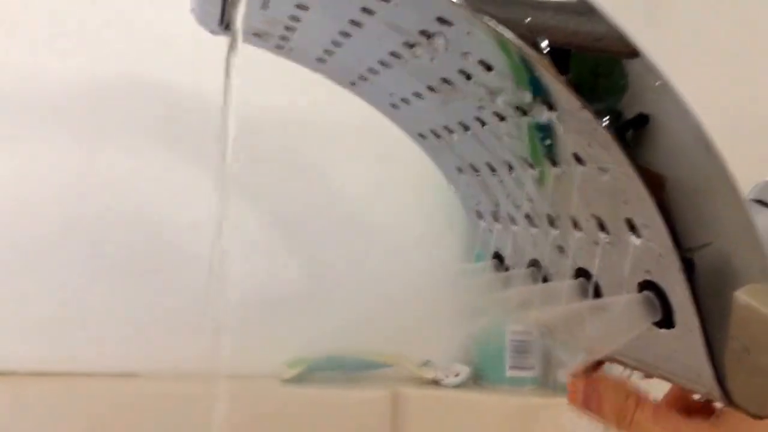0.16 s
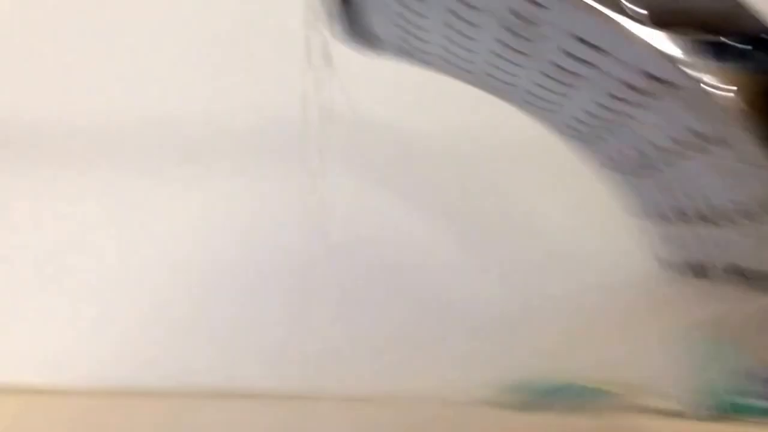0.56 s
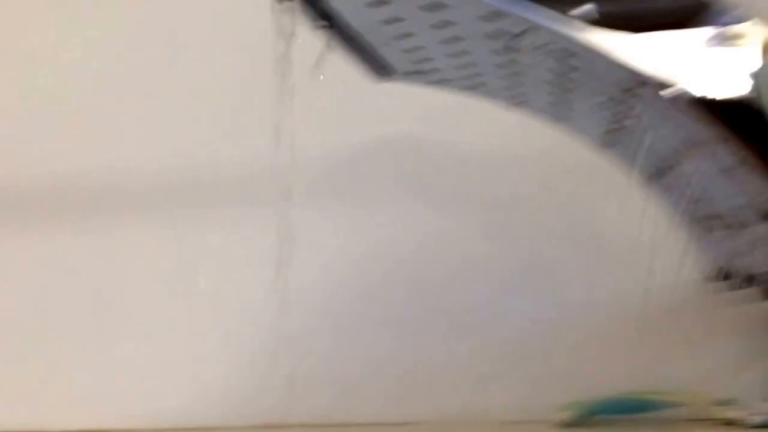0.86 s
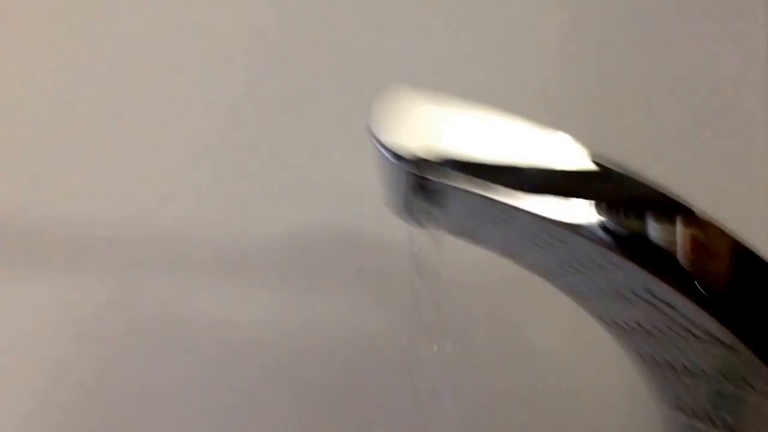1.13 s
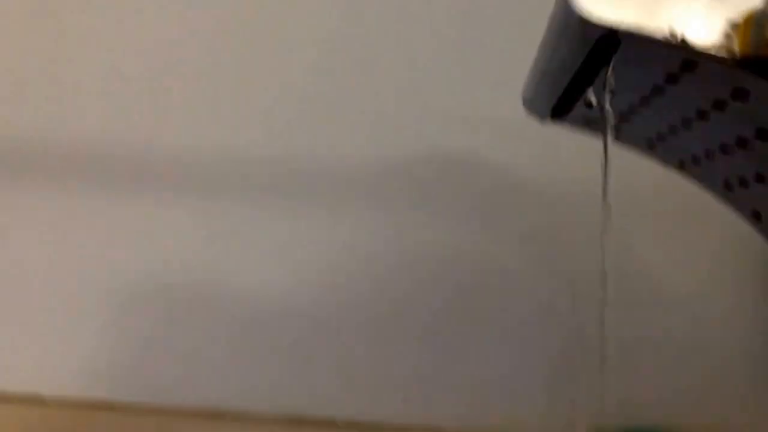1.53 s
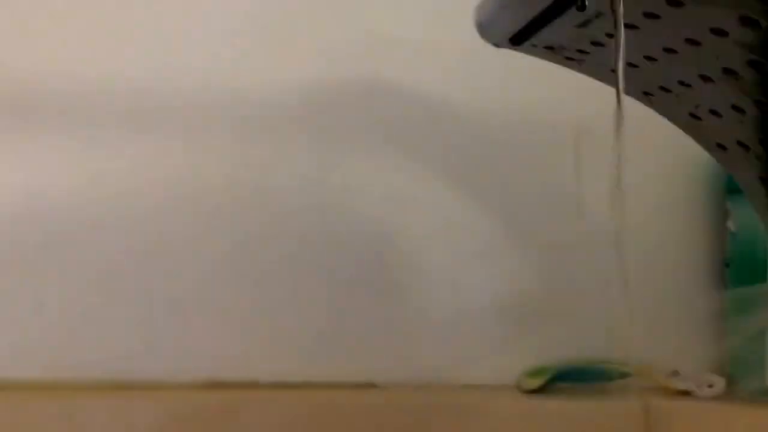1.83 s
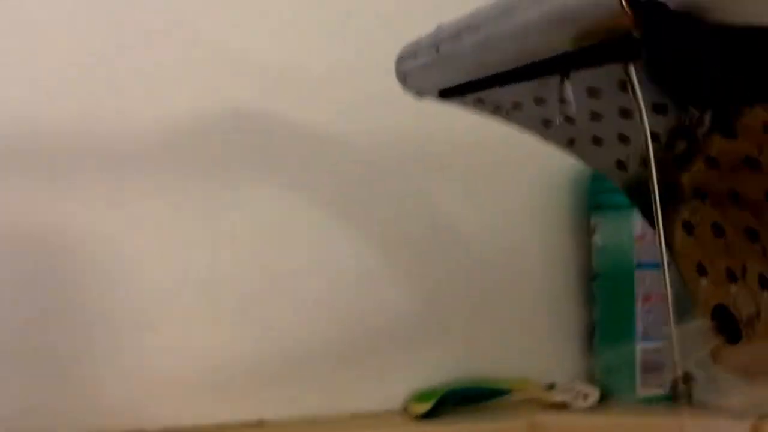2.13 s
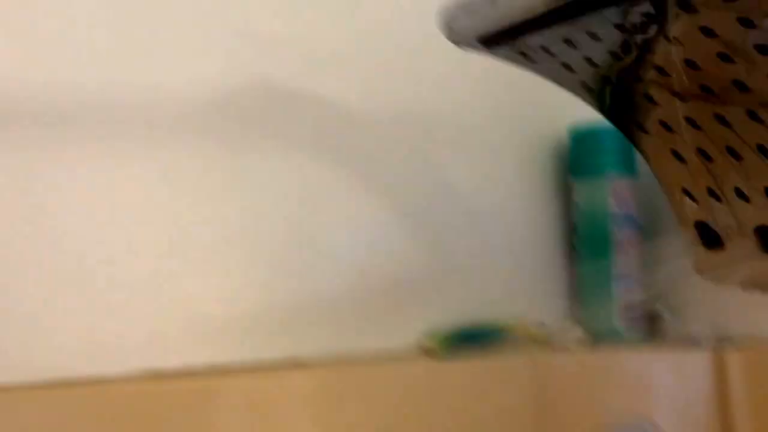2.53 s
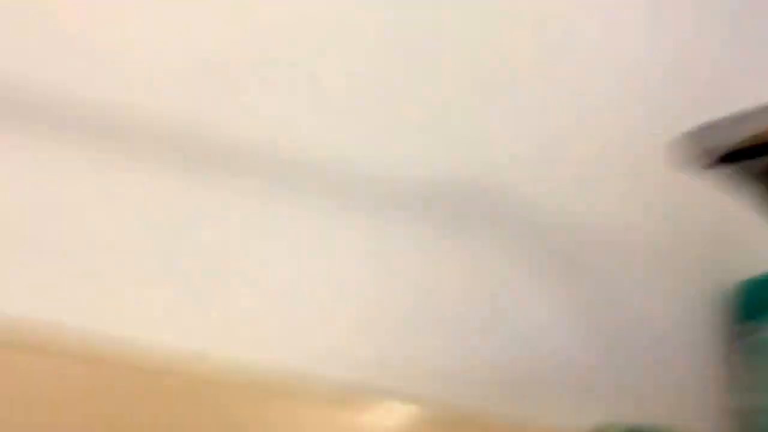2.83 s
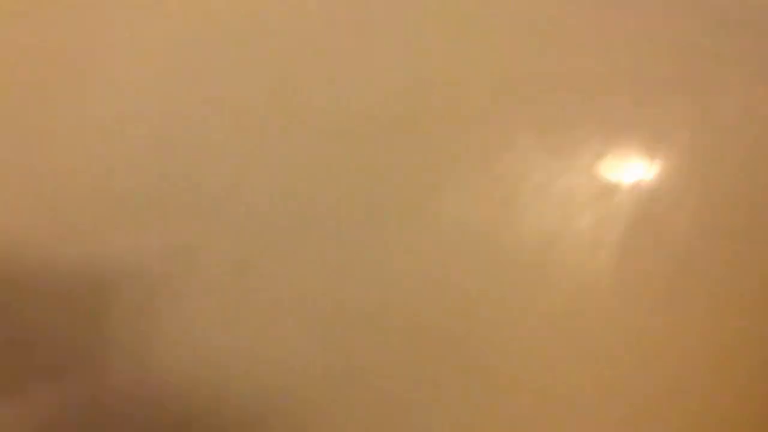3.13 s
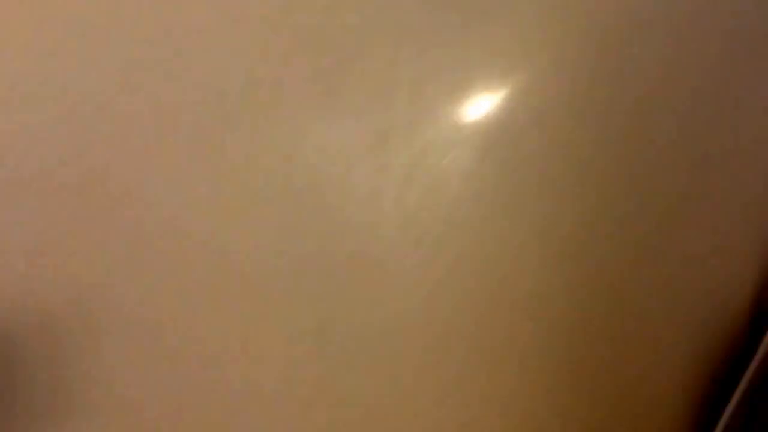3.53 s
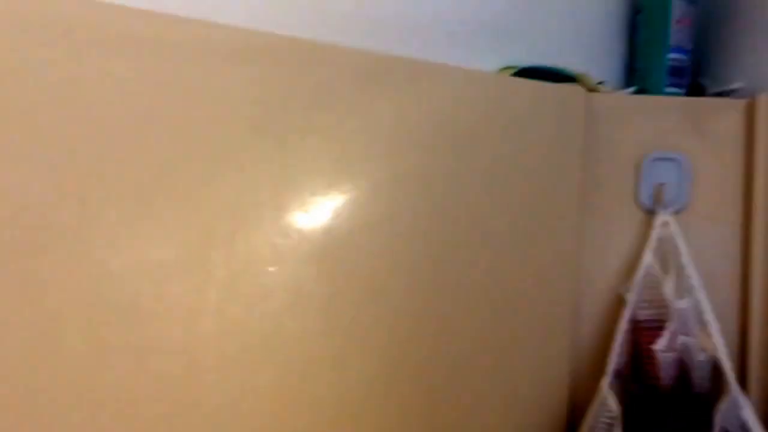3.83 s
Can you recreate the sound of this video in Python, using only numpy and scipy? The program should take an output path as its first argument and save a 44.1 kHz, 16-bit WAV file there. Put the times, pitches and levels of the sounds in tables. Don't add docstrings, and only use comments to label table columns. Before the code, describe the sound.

A shower head sprays a dense, bright, slightly fluttering hiss throughout, close to a small microphone in a tiled bathroom. Sharp drop ticks and small plinks cluster in the first 0.4 s, with a few later, over splashing, tub drumming and soft low handling knocks. From about 1.6 s the face fizz weakens; after 3 s hollow water thumps boom in the tub, and around 3.65 s the fizz drops away, leaving splash.

```python
import sys
import numpy as np
from scipy import signal
from scipy.fft import rfft, irfft, next_fast_len
from scipy.io import wavfile
from scipy.ndimage import uniform_filter1d, map_coordinates

SR = 44100
rng = np.random.default_rng(int(sys.argv[2]) if len(sys.argv) > 2 else 0)


def decibels_to_gain(level_db):
    exponent = np.asarray(level_db, float) / 20
    return 10 ** exponent


def wav_record(signal):
    frames = np.transpose(np.atleast_2d(signal))
    bounded = np.clip(frames, -1, 1)
    quanta = np.round(bounded * 32767).astype(np.int16)
    wavfile.write(sys.argv[1], SR, quanta)


N = 175518


def unit(x):
    return x / np.sqrt(np.mean(x ** 2) + 1e-20)


def curves(rows):
    s, *columns = np.transpose(rows)
    return [np.interp(np.arange(N) / SR, s, column) for column in columns]


def wobble(rate):
    return map_coordinates(rng.standard_normal(400), [np.arange(N) * min(rate, 90) / SR])


def filtered(x, response):
    m = next_fast_len(N + 8192)
    return irfft(rfft(x, m) * response(np.fft.rfftfreq(m, 1 / SR)), m)[..., :N]


def resonant(x, peaks):
    def response(f):
        power = 0
        for centre, breadth, db in peaks:
            distance = (f - centre) / breadth * 2
            power = power + decibels_to_gain(2 * db) / (1 + distance ** 2 / 3) ** 3
        return np.sqrt(power)
    return unit(filtered(x, response))


def spatter(patchy_db, spiky_db, share):
    z = signal.stft(rng.standard_normal(N), nperseg=512)[2]
    patches = uniform_filter1d(rng.standard_normal(z.shape), 5, axis=0)
    patches = uniform_filter1d(patches, 10, axis=1)
    hiss = signal.istft(z * decibels_to_gain(patchy_db * unit(patches)), nperseg=512)[1][:N]
    drop_size = np.minimum(rng.exponential(size=N), 7)
    impacts = rng.standard_normal(N) * decibels_to_gain(spiky_db * drop_size)
    share = np.clip(share, 0, 1)
    return np.sqrt(1 - share) * unit(hiss) + np.sqrt(share) * unit(impacts)


def mixed(main, extra, share_db):
    return (main + decibels_to_gain(share_db) * extra) / np.sqrt(2)


def thumps(rows, rise_s, sag):
    out, t = np.zeros(N + SR), np.arange(5000) / SR
    for s, db, hz in rows:
        phase = 2 * np.pi * hz * (t + sag * rise_s * (1 - np.exp(-t / rise_s)))
        swell = np.e * t / rise_s * np.exp(-t / rise_s)
        out[round(s * SR):][:len(t)] += decibels_to_gain(db) * swell * np.sin(phase)
    return out[:N]


def haze():
    # (frequency [Hz], level [dB])
    wash_tone = [(40, -32), (100, 1), (700, -5), (2800, -11), (4000, 3), (6500, -11), (8500, -3.5),
                 (14000, -5.5)]
    f, db = np.transpose(wash_tone)

    def colour(hz):
        return decibels_to_gain(np.interp(np.log(hz + 1), np.log(f), db, left=-40))
    return decibels_to_gain(-40) * unit(filtered(spatter(0.49, 0.85, 0.067), colour))


def bumps():
    # (time [s], peak [dB], pitch [Hz])
    knocks = [(.14, -41, 112), (.29, -43, 122), (.62, -45, 95), (1.055, -39, 115), (1.3, -38, 80.6),
              (1.68, -39, 115), (2.02, -42, 108), (2.28, -55.5, 70), (2.38, -48, 95), (2.68, -50, 80),
              (3.04, -40.5, 78), (3.483, -50, 80), (3.753, -38, 79)]
    # (frequency [Hz], width [Hz], level [dB])
    rumble = [(52, 22, -11), (78, 39, 8)]
    tremor_db = -62 + 3 * np.arange(N) / N + 2.8 * wobble(12)
    tremor = decibels_to_gain(tremor_db) * resonant(rng.standard_normal(N), rumble)
    return thumps(knocks, rise_s=0.0092, sag=0.22) + tremor


def tub():
    # (time [s], drumming [dB], depth of the microphone in the tub [0-1], ring of the rim [dB])
    tub_course = [(0, -40.5, 0.16, -56), (.3, -41.5, 0.06, -54), (.7, -41, 0.15, -53), (1, -39.5, 0, -47),
                  (1.3, -39.5, 0.1, -49), (1.6, -39.5, 0.2, -40.5), (1.9, -40, 0.3, -45),
                  (2.25, -38.5, 0.42, -38), (2.6, -39, 0.3, -41), (2.9, -42, 0.45, -39),
                  (3.05, -41.5, 0.96, -43.5), (3.5, -40.5, 0.87, -40.5), (3.98, -42, 0.72, -42.5)]
    # (time [s], peak [dB], pitch [Hz])
    slugs = [(2.45, -43, 237), (2.819, -45, 234), (2.925, -61, 236), (3.017, -39, 232), (3.113, -42, 231),
             (3.202, -43, 300), (3.24, -45, 225), (3.29, -51, 295), (3.38, -42, 155), (3.553, -44, 218),
             (3.64, -44, 244), (3.718, -45, 240), (3.812, -38, 213), (3.92, -44, 299)]
    # (frequency [Hz], width [Hz], level [dB])
    shell_tones = [(573, 310, -11), (716, 35, -6.5), (957, 154, -5), (1167, 42, -1.5), (1236, 260, -7),
                   (1580, 410, -5), (1936, 160, -3), (2220, 990, -6)]
    room_tones = [(87, 8.3, -11), (119.4, 56, 3), (227, 54, -1.5), (302, 19, -4.5), (358, 66, -1)]
    basin_tones = [(170, 44, -8), (230.4, 20, -3.5), (300, 22, -6), (378, 90, -10)]
    rim_tones = [(3165, 116, -2), (3250, 530, -3)]
    drum_db, depth, rim_db = curves(tub_course)
    depth = np.clip(depth, 0, 1)
    room_db = -46 + 0.9 * wobble(8.9) + 1.8 * wobble(18)
    room = decibels_to_gain(room_db) * (1 - depth) * resonant(spatter(0.55, 0.92, 0.04), room_tones)
    basin_db = -46.5 + 0.85 * wobble(4.84)
    basin = decibels_to_gain(basin_db) * depth * resonant(spatter(0.91, 4.6, 0.12), basin_tones)
    rim = decibels_to_gain(rim_db) * resonant(spatter(1.0, 1.5, 0.24), rim_tones)
    shell = decibels_to_gain(drum_db) * resonant(spatter(1.13, 5.0, 0.084), shell_tones)
    return shell + room + basin + rim + thumps(slugs, rise_s=0.011, sag=0)


def plinks():
    # (time [s], peak [dB], pitch [Hz])
    rim_drops = [
        (.05, -35, 1850),
        (.183, -37, 1850),
        (.752, -35, 1160),
        (2.58, -37, 1480),
        (2.835, -37, 1450),
        (.16, -42, 300),
        (.47, -41, 320),
        (2.47, -43, 470),
        (.8, -44, 190),
    ]
    return thumps(rim_drops, rise_s=0.0048, sag=0)


def ticks():
    # (time [s], peak [dB], pitch [Hz])
    stray_drops = [(0.0487, -4.5, 9000), (0.078, -17, 10500), (0.0982, -6, 9500), (0.164, -7, 10000),
                   (0.181, -5, 8450), (0.1881, -6, 10000), (0.2073, -9, 8500), (.2578, -17, 10000),
                   (0.3766, -6.5, 10800), (.832, -6, 8800), (1.721, -9, 10600), (2.483, -19, 10000),
                   (2.5871, -4, 10200), (3.5932, -23, 10000), (3.6391, -22, 10000)]
    click_cycles, fizz_s = 0.85, 0.0032
    out, t = np.zeros(N + SR), np.arange(600) / SR
    for s, db, hz in stray_drops:
        u = t * hz / click_cycles
        click = np.e * u * np.exp(-u) * np.sin(2 * np.pi * hz * t)
        fizz = decibels_to_gain(-13.5) * np.exp(-t / fizz_s) * np.diff(rng.standard_normal(len(t) + 1))
        out[round(s * SR):][:len(t)] += decibels_to_gain(db - 1.5) * (click + fizz)
    return out[:N]


def splash():
    # (time [s], splash level [dB], share of finest mist [dB])
    splash_course = [(0, -37, 1), (.3, -33.5, -2), (.55, -33, -4), (.7, -31, -10), (.9, -32, -9),
                     (1.1, -36, -4), (1.4, -33, -8), (1.55, -32, -5), (1.75, -32, -5), (2.1, -32, -4),
                     (2.35, -34, -2), (2.55, -30.5, -4), (2.8, -36.5, 0.5), (3.25, -32.5, -5),
                     (3.5, -29, -5), (3.75, -30, -5), (3.98, -31, -6)]
    # (frequency [Hz], width [Hz], level [dB])
    droplet_tones = [(9500, 2900, -1), (12000, 1600, 3.5), (13250, 1200, 5)]
    mist_tones = [(13900, 1600, -5), (14560, 850, -5), (15000, 500, -3)]
    splash_db, mist_db = curves(splash_course)
    droplets = resonant(spatter(0.51, 1.9, 0.071), droplet_tones)
    mist = resonant(spatter(1.2, 2.5, 0.15), mist_tones)
    return decibels_to_gain(splash_db + 4.5 + 0.19 * wobble(23.6)) * mixed(droplets, mist, mist_db)


def head():
    # (time [s], nearness of the jets [dB], sharpness [dB], fullness [dB])
    jet_course = [(0, -33, 0, -0.5), (.3, -30, -6, -3), (.7, -30.5, -3.5, -2), (1.1, -30, -2.5, -4.5),
                  (1.35, -30, -6.5, -1), (1.6, -29.5, -2, -5), (2, -30, -0.5, -1), (2.3, -28, -2.5, -8),
                  (2.55, -29.5, -2.5, -4.5), (2.75, -33, -2.5, -5.5), (3.08, -34.5, 0.5, -4.5),
                  (3.3, -36, -2, -1.5), (3.6, -37, -0.5, -1.5), (3.72, -35, 3.5, -6.5),
                  (3.98, -36, 3.5, -2)]
    # (time [s], how far the face points at the microphone [dB], its outer ring [dB])
    face_course = [(0, -28.5, 2.5), (.25, -31.5, 2.5), (.5, -29.5, 3), (.6, -29, -2), (1, -29.5, 1.5),
                   (1.3, -31.5, -1), (1.52, -28.5, -3), (1.65, -35, 3), (2.1, -38.5, 6), (2.55, -43, 9),
                   (2.7, -40.5, 8.5), (3.3, -42.5, 5), (3.6, -40, -6), (3.67, -52, -4), (3.98, -57, 0)]
    # (frequency [Hz], width [Hz], level [dB])
    cavity_tones = [(4513, 340, -2), (4954, 330, -1.5), (5410, 360, -4)]
    throat_tones = [(5940, 700, 2), (6580, 1330, -2)]
    handle_tones = [(3510, 360, -5), (4014, 530, -1)]
    nozzle_tones = [(7460, 700, -2), (8620, 1240, 3)]
    ring_tones = [(10000, 300, -12), (11260, 2670, 12.5)]
    flutter = wobble(19) + 0.4 * wobble(50)
    jets_db, sharp_db, full_db = curves(jet_course)
    face_db, ring_db = curves(face_course)

    cavity = resonant(spatter(0.71, 2.5, 0.11), cavity_tones)
    throat = resonant(spatter(1.46, 0.98, 0.023), throat_tones)
    handle = resonant(spatter(0.98, 5.4, 0.13), handle_tones)
    jets = mixed(cavity, throat, sharp_db) + decibels_to_gain(full_db - 4.0) * handle

    nozzles = resonant(spatter(0.66, 1.2, 0.32), nozzle_tones)
    ring = resonant(spatter(1.2, 1.8, 0.46), ring_tones)
    face = mixed(nozzles, ring, ring_db)

    jets_db = jets_db + 1.5 + 0.33 * flutter
    face_db = face_db + 1.5 + 0.16 * flutter + 0.83 * wobble(20)
    return decibels_to_gain(jets_db) * jets + decibels_to_gain(face_db) * face


def shadowed(x):
    # (from [s], to [s], frequency [Hz], width [Hz], depth [dB])
    shadows = [
        (1, 0.77, 2700, 400, -1.5),
        (1.1, 1.75, 2800, 310, -3),
        (.5, 1.27, 7170, 620, -3),
        (2.5, 2.75, 5000, 780, -1),
        (0.5, 1.02, 9800, 830, -0.5),
        (1.5, 1.62, 1150, 250, -1),
        (3.5, 3.9, 3500, 150, -0.5),
        (3.5, 4.3, 5700, 500, -2.5),
    ]
    # (from [s], to [s], frequency [Hz], width [Hz], depth [dB])
    hollows = [
        (.6, .8, 14200, 900, -2),
        (.8, .96, 14600, 800, -4),
        (1.36, 1.57, 14200, 500, -1.5),
        (3.66, 3.88, 8700, 1800, -5.5),
        (3.88, 4.3, 8300, 1400, -4),
    ]
    hz, t, z = signal.stft(x, SR, nperseg=1024)

    def edge(s):
        return 0.5 + 0.5 * np.tanh((t - s) / 0.033)
    hollow_db = 0
    for start, end, centre, breadth, db in shadows + hollows:
        shape = np.exp(-((hz - centre) / breadth) ** 4)
        hollow_db = hollow_db + db * np.outer(shape, edge(start) - edge(end))
    return signal.istft(z * decibels_to_gain(hollow_db), SR, nperseg=1024)[1][:N]


def tiles(x):
    z = signal.stft(x, nperseg=2048)[2]
    low = np.clip(np.arange(len(z)) / 20, 0, 1)[:, None]
    ripple = uniform_filter1d(rng.standard_normal(z.shape), size=8, axis=1)
    ripple = uniform_filter1d(ripple, size=2, axis=0)
    comb_db = 2 * low * unit(ripple)
    evened = decibels_to_gain(comb_db) / np.sqrt(np.mean(decibels_to_gain(2 * comb_db)))
    return signal.istft(z * evened, nperseg=2048)[1][:N]


def scene():
    water = tiles(shadowed(head() + splash() + tub() + haze()))
    mono = water + ticks() + bumps() + plinks()
    return np.array([mono, mono])


def gated(x):
    # (frequency [Hz], level below which a band is dropped [dB])
    gate_curve = [(2000, -73), (2800, -70.5), (5000, -70), (8500, -68), (12000, -63), (13500, -60.5),
                  (14300, -60), (14900, -61), (15200, -65)]
    hz, _, z = signal.stft(x, SR, window="cosine", nperseg=2048)
    f, gate_db = np.transpose(gate_curve)
    strength = np.sqrt(np.abs(uniform_filter1d(np.abs(z) ** 2, size=6, axis=-2)))
    heard = strength > decibels_to_gain(np.interp(hz, f, gate_db, left=-200))[:, None]
    return signal.istft(z * heard, SR, window="cosine", nperseg=2048)[1][..., :N]


def fills(mono):
    puffs = [(22, 384, 480), (54, 196, 240), (54, 544, 608), (58, 448, 512), (60, 240, 292), (85, 320, 384),
             (87, 216, 264), (87, 640, 704), (90, 216, 264), (90, 292, 352), (96, 320, 384),
             (105, 240, 292), (133, 292, 352), (152, 240, 292), (156, 292, 384)]
    hop, first = 1024, 144
    out, n = np.zeros(N), np.arange(2 * hop) + 0.5
    fade = signal.windows.kaiser_bessel_derived(2 * hop, 4 * np.pi)
    for number, low, high in puffs:
        at = slice(first + number * hop, first + (number + 2) * hop)
        lines = np.arange(low, high) + 0.5
        waves = fade * np.cos(np.pi / hop * np.outer(lines, n + hop / 2))
        loudness = np.sqrt(np.mean((waves @ mono[at]) ** 2)) * 2 / hop
        out[at] += decibels_to_gain(-3) * loudness * unit(rng.uniform(-1, 1, high - low)) @ waves
    return out


def band_limit(x):
    return signal.sosfilt(signal.butter(12, 16460, fs=SR, output="sos"), x)


def record(dry):
    x = filtered(gated(dry), lambda hz: hz < 15330)
    mix = x + fills(x[0]) * [[1], [-1]]
    return band_limit(mix)


dry = scene()
out = record(dry)
wav_record(out)
```